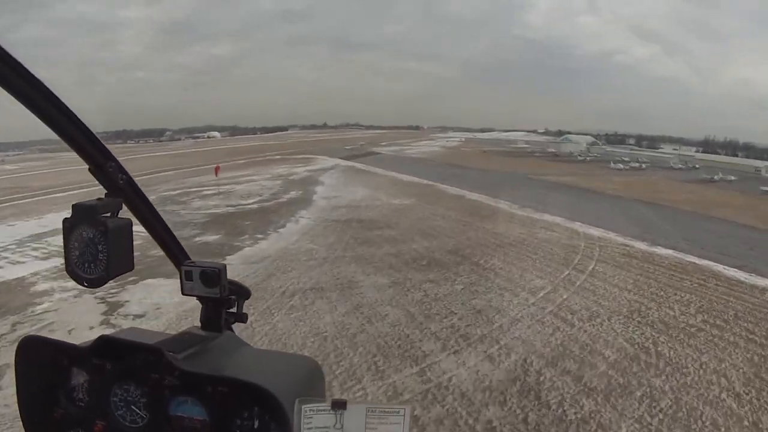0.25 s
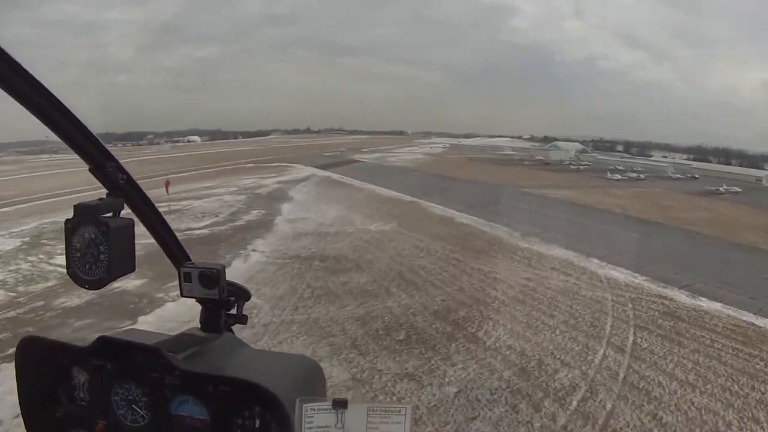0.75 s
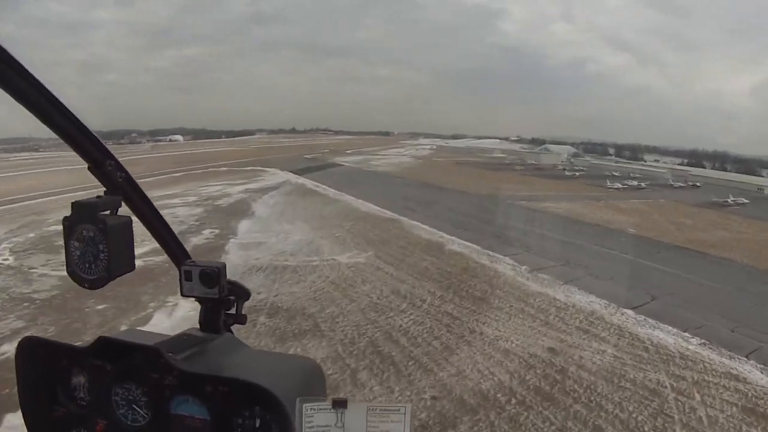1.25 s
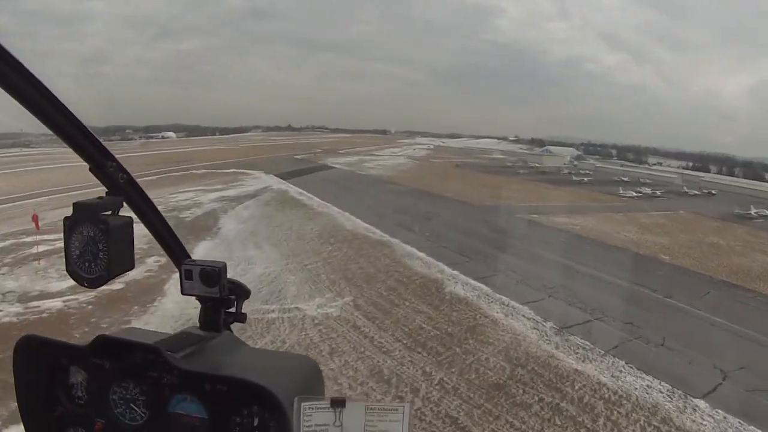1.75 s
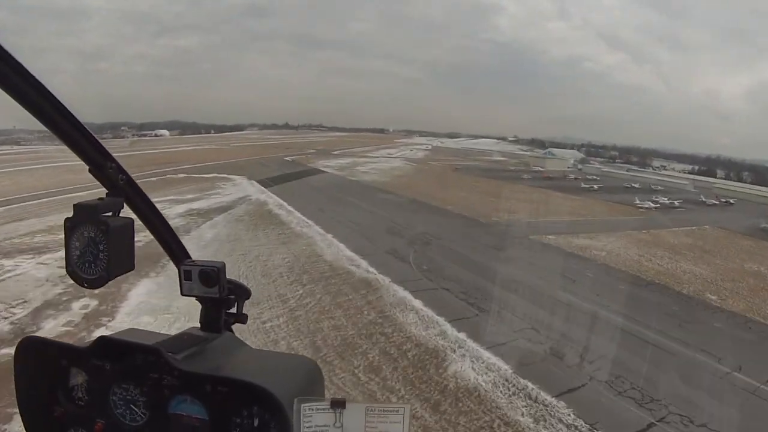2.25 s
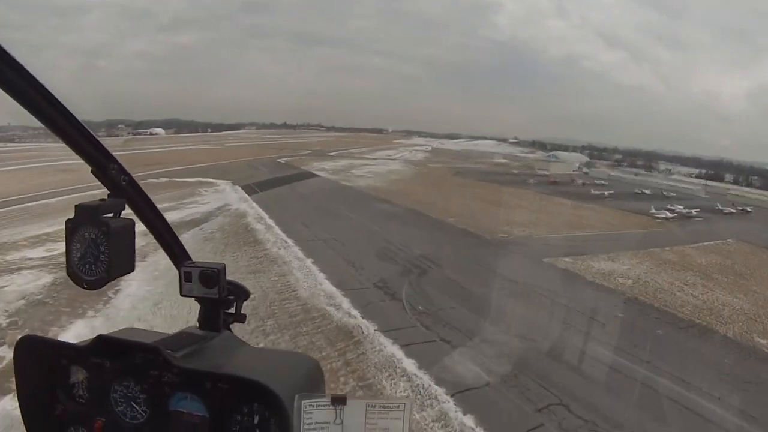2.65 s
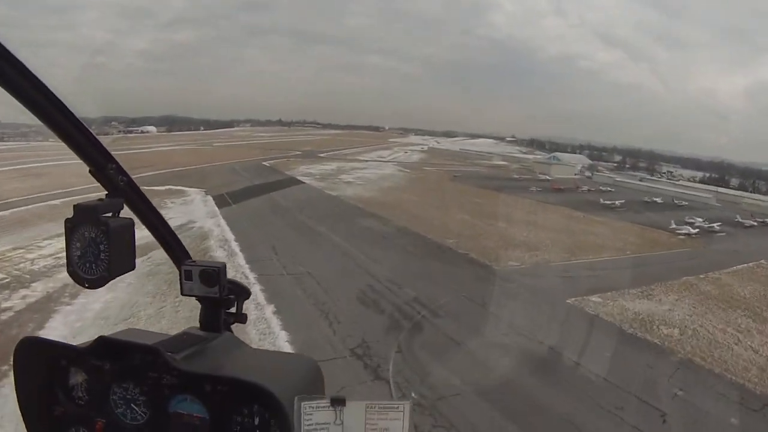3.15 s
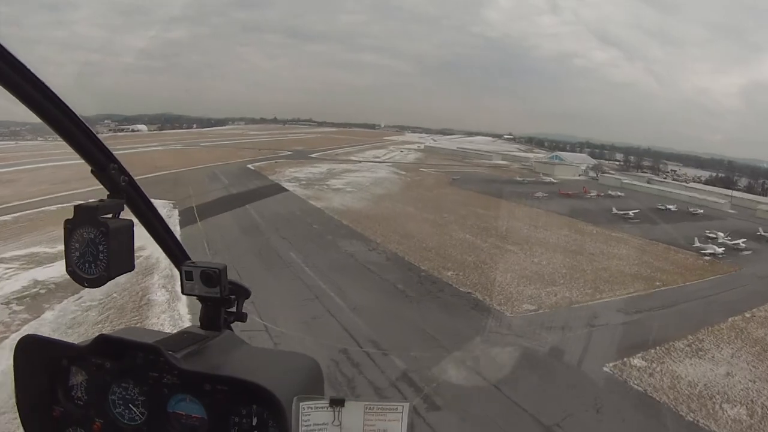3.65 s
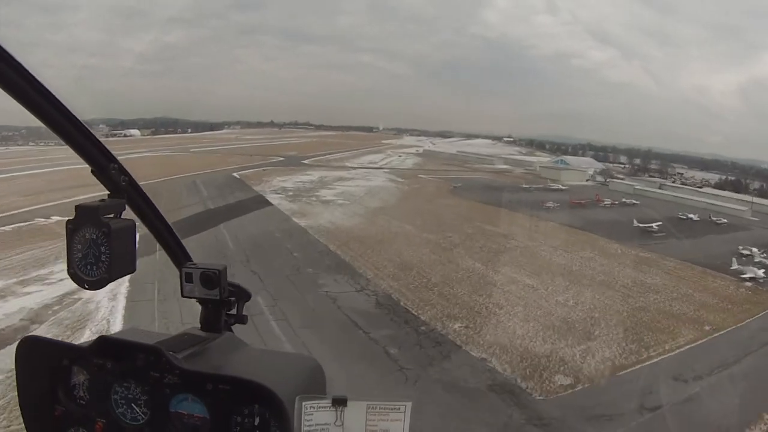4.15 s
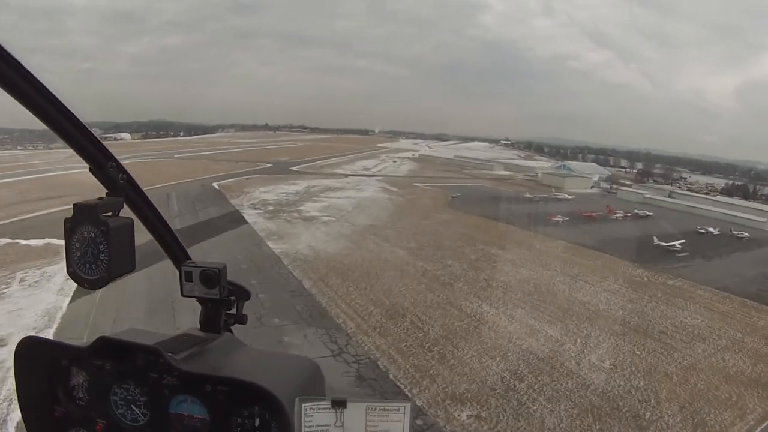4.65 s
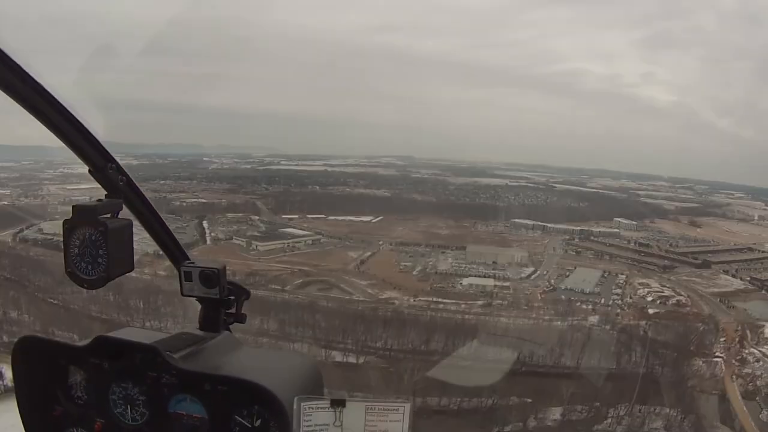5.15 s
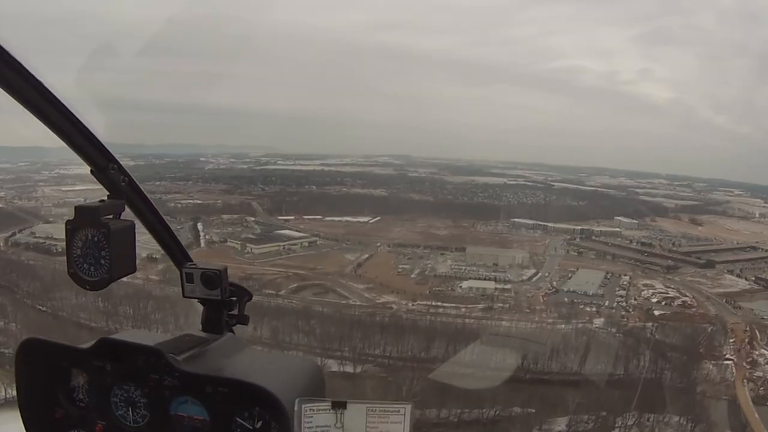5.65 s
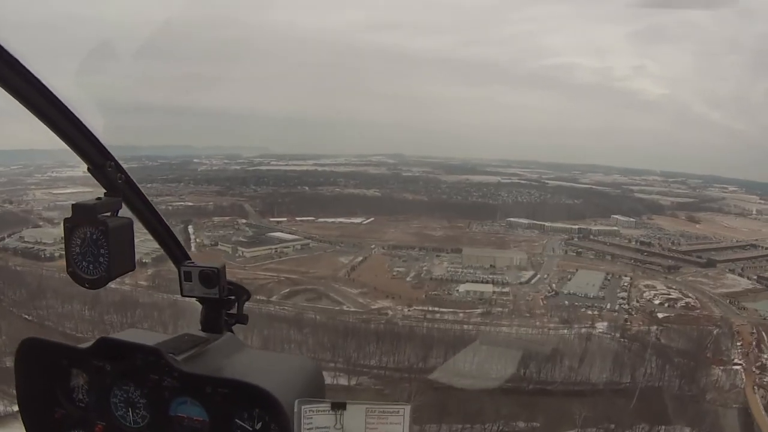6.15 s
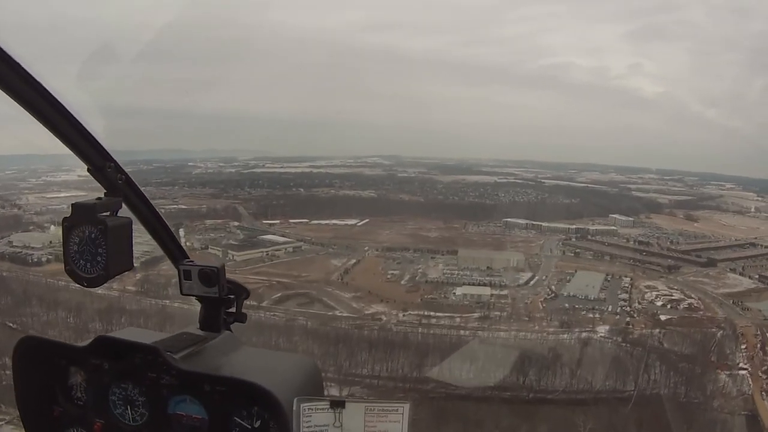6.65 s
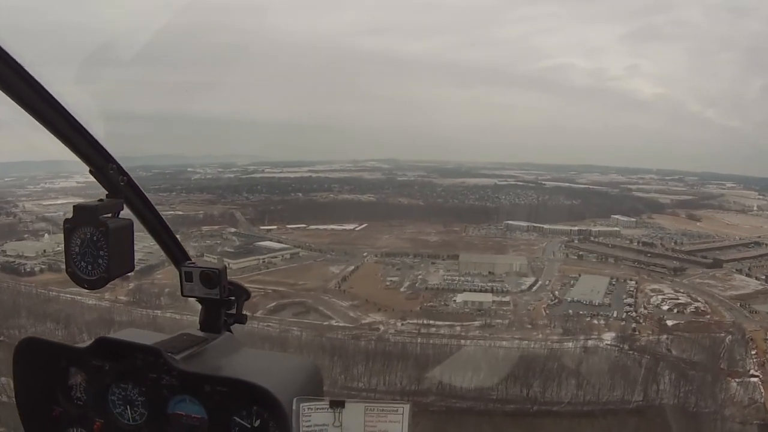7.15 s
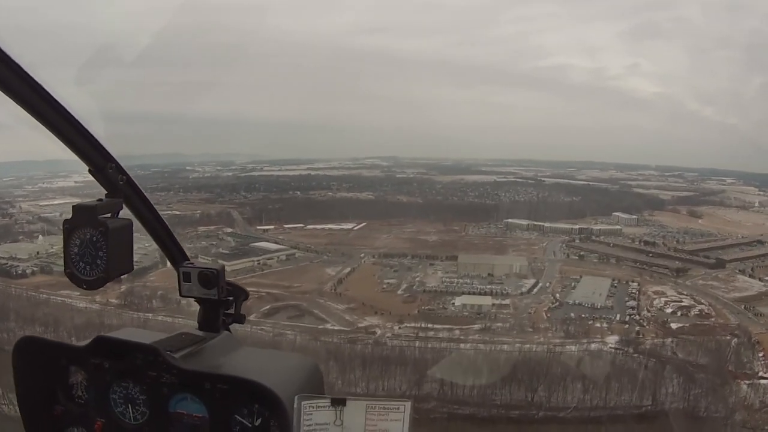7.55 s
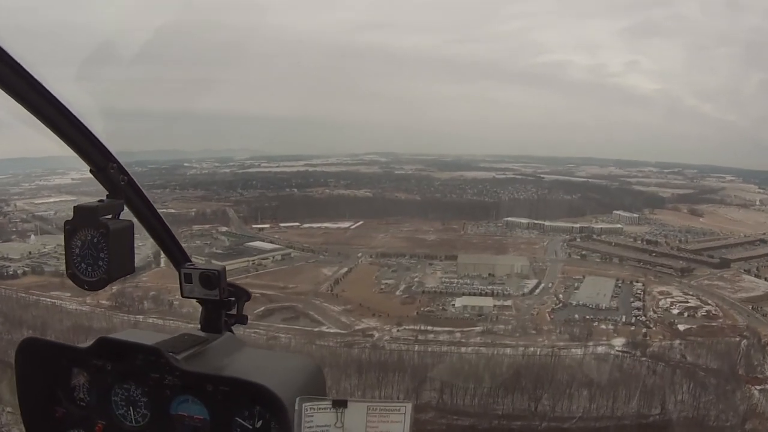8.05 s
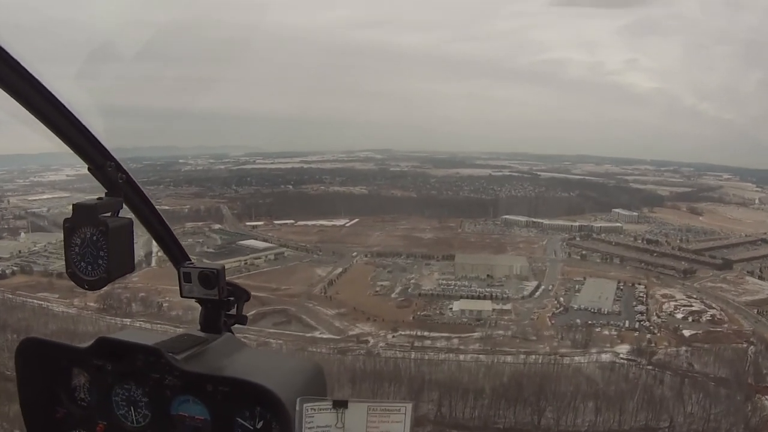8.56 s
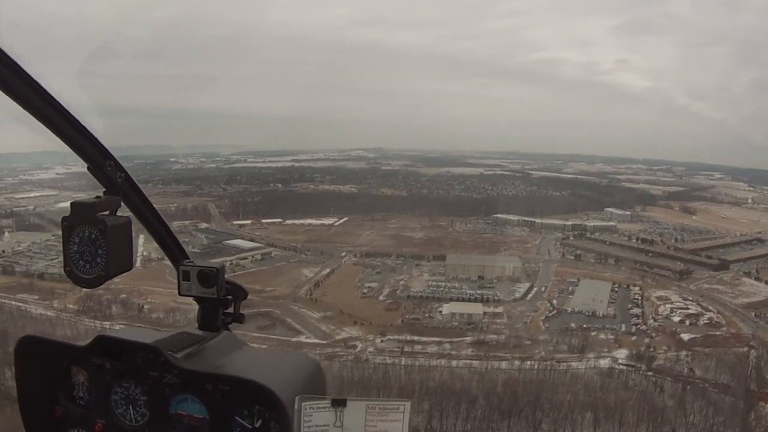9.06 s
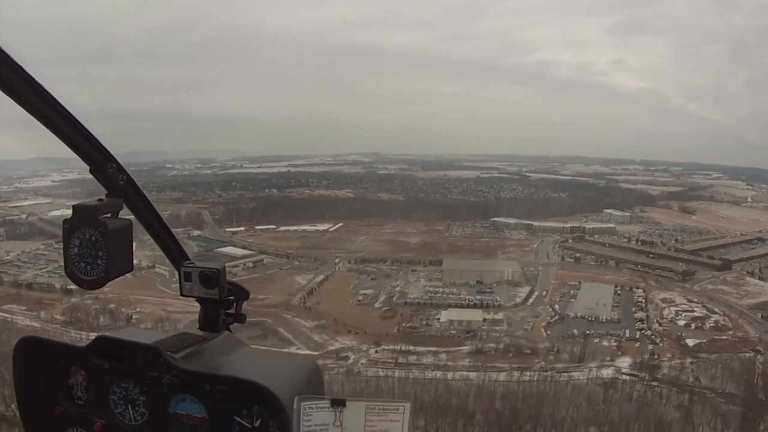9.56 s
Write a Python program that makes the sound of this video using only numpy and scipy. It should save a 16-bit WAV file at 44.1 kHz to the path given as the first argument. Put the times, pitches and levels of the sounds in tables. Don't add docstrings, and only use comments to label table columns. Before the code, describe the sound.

Close inside a small piston helicopter cabin, a loud, deep engine drone throbs with a rapid blade beat of about seventeen per second. A loose camera mount slams and chatters in dry, hard knocks. Panels rumble and dull wind hisses beneath. Around five seconds a click cuts to the climb, much the same but duller in its knocking. The housed microphone sounds boxy and slightly saturated.

```python
import sys
import numpy as np
from scipy import signal
from scipy.io import wavfile
from scipy.ndimage import uniform_filter1d

SR = 44100
rng = np.random.default_rng(int(sys.argv[2]) if len(sys.argv) > 2 else 0)


def volts_from_db(level):
    exponent = np.asarray(level, float) / 20
    return 10 ** exponent


def int16_out(signal):
    q = np.round(np.clip(np.atleast_2d(signal).T, -1, 1) * 32767)
    wavfile.write(sys.argv[1], SR, q.astype(np.int16))


N = 431738


def evened(x):
    return x / np.sqrt(np.mean(x ** 2) + 1e-20)


def curve(table):
    return np.interp(np.arange(N) / SR, *np.transpose(table))


def wander(count, rate_hz):
    knots = rng.standard_normal((count, int(N / SR * rate_hz) + 2))
    at = np.arange(N) * rate_hz / SR
    return [np.interp(at, np.arange(len(row)), row) for row in knots]


def noise(colour, size, patchy_db):
    hz = np.fft.rfftfreq(size, 1 / SR)
    real, imag, patches = rng.standard_normal((4 * N // size + 5, len(hz), 3)).T
    patches = uniform_filter1d(patches, size=6, axis=0)
    patches = evened(uniform_filter1d(patches, size=6, axis=1))
    colour_hz, colour_db = np.transpose(colour)
    level_db = np.interp(np.log(hz + 1), np.log(colour_hz + 1), colour_db, right=-120)
    spectra = (real + 1j * imag) * volts_from_db(level_db[:, None] + patchy_db * patches)
    return evened(signal.istft(spectra, nperseg=size, noverlap=3 * size // 4)[1][:N])


# (time [s], speed [cycles/s])
ENGINE_SPEED = [
    [(0.0, 21.892), (0.852, 21.89), (1.704, 21.864), (2.556, 21.827), (3.407, 21.818), (4.259, 21.784),
     (5.111, 21.83)],
    [(5.111, 21.816), (5.891, 21.927), (6.671, 22.002), (7.45, 22.019), (8.23, 21.997), (9.01, 21.92),
     (9.79, 21.961)],
]
GEARING = [
    (-.15, -.40, .7932, 5.0845),
    (.676, .283, .7956, 5.099),
]


def shafts():
    t = np.arange(N) / SR
    stage = (t >= ENGINE_SPEED[1][0][0]).astype(int)
    turns = np.zeros(N)
    for k, rows in enumerate(ENGINE_SPEED):
        here = stage == k
        turns[here] = np.cumsum(np.interp(t[here], *np.transpose(rows))) / SR
    engine_start, blade_start, blade_gear, tail_gear = np.array(GEARING)[stage].T
    return engine_start + turns, blade_start + blade_gear * turns, tail_gear * turns, stage


# (engine order [1], blade order [1], takeoff rms [dB], climb rms [dB])
ENGINE_TONES = [(1, 0, -27, -31), (2, 0, -33, -31), (3, 0, -20, -22), (4, 0, -27, -27), (5, 0, -34, -41),
                (6, 0, -39, -44), (7, 0, -44, -47), (8, 0, -53, -50), (10, 0, -51, -56), (12, 0, -42, -52),
                (14, 0, -42, -43), (15, 0, -51, -54), (22, 0, -57, -57), (27, 0, -58, -60),
                (34, 0, -60, -63), (36, 0, -60, -60), (44, 0, -56, -58), (51, 0, -59, -62),
                (13, 0, -51, -53), (11, 0, -53, -51)]
BLADE_BEATS = [(0, 1, -40, -35), (0, 1.5, -46, -46), (0, 2, -46, -50), (0, 4, -27, -25), (0, 5, -52, -41),
               (2, 1, -45, -41), (3, 1, -38, -38), (3, 2, -47, -41), (4, -1, -35, -35), (4, 1, -38, -37),
               (4, 2, -50, -40), (5, -1, -45, -50), (5, 1, -42, -46), (2, 2, -47, -49), (2, 3, -47, -48),
               (3, 3, -50, -45), (4, 3, -49, -47), (4, 4, -49, -48), (5, 2, -48, -47), (6, 1, -52, -47),
               (0, 18, -56, -50), (0, 19, -55, -47), (0, 20, -55, -48), (0, 21, -58, -51)]
# (multiple of tail pass rate [1], takeoff rms [dB], climb rms [dB])
TAIL_TONES = [(2 / 3, -39, -41), (1, -35, -36), (2, -48, -42.5), (3, -47, -48), (8.053, -57, -62),
              (30.35, -66, -67), (91.2, -90, -91)]


def drivetrain(engine, blade, tail, stage):
    out = np.zeros(N)
    tones = ENGINE_TONES + BLADE_BEATS
    drift = wander(count=len(tones) + len(TAIL_TONES), rate_hz=3.0)
    centre = np.array([3.5, 4.0])[stage]
    for (m, n, *level_db), sway in zip(tones, drift):
        if m + n < 3 or m == 0:
            lag = .23 * m
        else:
            lag = .08 * (m - 3) * (m + 3 - 2 * centre)
        sign = -1 if n < 0 else 1
        gain = volts_from_db(np.array(level_db)[stage] + .9 * sway)
        out += sign * gain * np.cos(2 * np.pi * (m * engine + n * blade - lag))
    for (k, *level_db), sway in zip(TAIL_TONES, drift[::-1]):
        gain = volts_from_db(np.array(level_db)[stage] + 1.5 * sway)
        out += gain * np.cos(2 * np.pi * (k * tail + 0.11 * sway))
    return np.sqrt(2) * out


# (time [s], blow level [dB], brightness [dB])
HARD_KNOCKS = [(0.0613, -16.5, -10), (0.186, -20, -17), (0.2334, -21.5, -12), (0.6439, -19, -15),
               (0.6998, -15.5, -11.5), (1.053, -23.5, -13), (1.284, -15.5, -14), (1.514, -20.5, -11),
               (1.7509, -18.5, -12), (1.8637, -19.5, -11.5), (1.924, -18.5, -11), (2.0662, -20, -11),
               (2.152, -14.5, -13), (2.3815, -16, -12), (2.4379, -20, -10.5), (2.6105, -15, -16),
               (2.8953, -17, -12), (3.1258, -17.5, -12), (3.3553, -16, -14.5), (3.5384, -17, -13.5),
               (3.6531, -19.5, -17), (3.7095, -19, -13), (3.9389, -19.5, -14), (4.122, -19, -15),
               (4.1689, -19.5, -16), (4.3979, -19, -15), (4.581, -18, -14), (4.9816, -20, -14),
               (5.0414, -18, -15), (5.0968, -16, -13),
               (5.1448, -18.5, -17), (5.1995, -19, -12.5), (5.26, -15.5, -13.5), (5.429, -19, -16),
                (6.3421, -18, -19), (6.5228, -13, -14), (6.579, -16.5, -17), (6.7511, -20, -16),
                (6.808, -15, -16), (6.9196, -16, -14), (7.0345, -15.5, -16), (7.0918, -20, -15),
                (7.1467, -17.5, -16), (7.2056, -15.5, -16), (7.2625, -17, -16), (7.4906, -17.5, -16),
                (7.7182, -17.5, -16), (8.352, -16.5, -15), (8.3994, -18, -17), (8.6915, -19.5, -17),
                (8.746, -18.5, -16), (8.8078, -19, -15), (8.9204, -17, -21), (8.9761, -19.5, -12.5),
                (9.0364, -16, -15), (9.205, -19, -17), (9.266, -21, -14), (9.434, -14.5, -14),
                (9.5501, -19, -14), (9.6632, -16.5, -13)]
# (time [s], blade angle [turns])
SLAM_ANGLE = [(0, -.34), (.8, -.2), (1.2, -.09), (2.1, -.03), (3.2, -.14), (4.1, -.06), (5.11, -.08),
              (5.112, -.16), (6.3, -.11), (7.0, -.15), (7.8, -.18), (8.6, -.13), (9.79, -.15)]
# (time [s], slam level [dB])
LOOSENESS = [(0, 1), (.8, 0), (1.3, -5), (2.2, 0.5), (4.3, -1), (5.1, -0.5), (5.5, -1.5), (6.2, 1),
             (7.2, -2), (8.5, 1.5), (9.79, -3)]
JOLT_ANGLES = [
    (.19, .4, .6, .94),
    (.13, .35, .6, .88),
]
# (level [dB], ..)
JOLT_DB = [
    (-22, -27, -23.5, -22),
    (-23, -21, -21, -21),
]
JOLT_PULL = (.9, .6)


def knocks(engine, blade, stage):
    miss_db_per_turn, scatter_db, jitter_s = 28, 1.5, .0012
    stray_share, stray_db, stray_spread_db = np.array((.35, .18)), -31, 2.5
    bright_db, bright_spread_db = np.array((-11.5, -14.5)), 2.5
    t = np.arange(N) / SR
    jolts = np.array(JOLT_ANGLES)

    at = np.flatnonzero(np.diff(np.floor(blade - curve(SLAM_ANGLE))) == 1)
    part, chance = stage[at], rng.standard_normal((len(at), 3))
    gaps = (jolts[part] - engine[at, None] + .5) % 1 - .5
    nearest = np.argmin(abs(gaps), axis=1)
    gap = gaps[np.arange(len(at)), nearest]
    pull_s = np.array(JOLT_PULL)[part] * gap / ENGINE_SPEED[0][0][1]
    slam_s = t[at] + pull_s + jitter_s * chance[:, 0]
    slam_db = np.array(JOLT_DB)[part, nearest] + curve(LOOSENESS)[at]
    slam_db = slam_db - miss_db_per_turn * abs(gap) + scatter_db * chance[:, 1]
    slams = np.transpose([slam_s, slam_db, bright_db[part] + bright_spread_db * chance[:, 2]])

    at = np.flatnonzero((np.diff(np.floor(engine - jolts[stage].T), axis=1) == 1).any(0))
    part, chance = stage[at], rng.standard_normal((len(at), 3))
    picked = rng.random(len(at)) < stray_share[part]
    strays = np.transpose([t[at] + 2 * jitter_s * chance[:, 0],
                           stray_db + stray_spread_db * abs(chance[:, 1]),
                           bright_db[part] - 4.0 + bright_spread_db * chance[:, 2]])[picked]

    hard = np.array(HARD_KNOCKS) + (0, -1.0, 4.0)
    rest = np.vstack([slams, strays])
    clear = abs(rest[:, :1] - hard[:, 0]).min(axis=1) > .018
    return np.vstack([hard, rest[clear & (rest[:, 0] > 0)]])


def ring(x, hz, width_hz):
    r, w = np.exp(-np.pi * width_hz / SR), 2 * np.pi * hz / SR
    return signal.lfilter([0, np.sin(w)], [1, -2 * r * np.cos(w), r * r], x)


# (frequency [Hz], width [Hz], level [dB])
MOUNT_MODES = [(1060, 140, -17), (1212, 230, -8), (1548, 221, 2), (1743, 238, -1), (2066, 180, -10.5),
               (3060, 3000, -29.5), (3570, 230, -22.5)]
# (frequency [Hz], width [Hz], level [dB])
SHELL_MODES = [(2364, 63, -9), (2422, 72, -8.5)]


def rattle(engine, blade, stage):
    s, blow_db, bright_db = knocks(engine, blade, stage).T
    chance = rng.random((len(s), 12))
    bounce = np.arange(4)
    after_s = np.cumsum((.0007 + 0.002385 * chance[:, :4]) * (bounce > 0), axis=1)
    at = np.minimum(((s[:, None] + after_s) * SR).astype(int), N - 1)
    size = volts_from_db(blow_db[:, None] + 2.0 - bounce * (3.5 + 5.4 * chance[:, 4:8]))
    size[:, 1:] *= np.sign(chance[:, 9:] - .5)
    dull, bright = np.zeros((2, N))
    np.add.at(dull, at, size)
    np.add.at(bright, at, size * volts_from_db(bright_db[:, None] + 4.5))

    shaken = signal.lfilter([1], [1, -np.exp(-1 / (0.0062 * SR))], abs(dull))
    tremble = volts_from_db(-40.5 + 3.0 * np.cos(2 * np.pi * (blade + 0.059))) + 0.19 * shaken
    spread = volts_from_db(3.0 * np.minimum(rng.exponential(1, N), 3))
    hits = rng.random(N) < 400 / SR
    chatter = hits * tremble * spread * rng.choice([-1, 1], N)

    body = np.zeros(N)
    for k, (hz, width_hz, db) in enumerate(MOUNT_MODES):
        body += (-1) ** k * volts_from_db(db) * ring(dull + chatter, hz, width_hz)
    for hz, width_hz, db in SHELL_MODES:
        body += volts_from_db(db) * ring(bright + volts_from_db(-7.0) * chatter, hz, width_hz)
    contact = signal.windows.hann(14)
    return np.convolve(body, contact / contact.sum(), "same")


# (frequency [Hz], density [dB])
RUMBLE = [(14, -22), (22, -6), (32, -11), (52, -11), (66, 1), (100, -3), (150, -6), (168, -10), (250, -14),
          (263, -4), (332, -5), (346, -11), (430, -14), (520, -30)]
# (frequency [Hz], density [dB])
HISS = [(400, -30.5), (500, -6), (560, -7.5), (610, 1.5), (670, 0.5), (720, -9), (970, -2.5), (1130, -7.5),
        (1550, -3), (2000, -6), (2230, -11), (2420, -16.5), (2650, -23), (3200, -39.5)]
# (frequency [Hz], density [dB])
AIR = [(2200, -38.5), (2800, 2.5), (3400, 0), (3750, -5), (5000, -6.5), (6100, -7.5), (7000, -14),
       (7900, -20), (9000, -23.5), (10100, -23), (12000, -33.5), (13600, -37.5), (13750, -69)]
# (frequency [Hz], density [dB])
SWISH = [(4200, -40), (5200, -8), (6500, -0.5), (7300, -2), (7900, -9.5), (9500, -21), (11000, -43)]
# (rumble [dB], hiss [dB], air [dB])
CABIN_DB = [
    (-29.5, -40, -52.5),
    (-29, -39.5, -52.5),
]
# (time [s], level [dB])
BLADE_LOAD = [
    (0, -68.5),
    (2.5, -63.5),
    (5.092, -64),
    (5.13, -62.5),
    (9.79, -64),
]


def cabin(blade, stage):
    rumble_db, hiss_db, air_db = np.array(CABIN_DB)[stage].T
    pump = np.cos(2 * np.pi * (blade + .05))
    rumble = noise(RUMBLE, size=8192, patchy_db=0) * volts_from_db(rumble_db + 1.4 * pump)
    hiss = noise(HISS, size=1024, patchy_db=1.5) * volts_from_db(hiss_db + 1.2 * pump)
    air = noise(AIR, size=512, patchy_db=1.9) * volts_from_db(air_db)
    sweep = evened(volts_from_db(7.0 * np.cos(2 * np.pi * (blade - .56))))
    swish = noise(SWISH, size=256, patchy_db=4.0) * sweep * volts_from_db(curve(BLADE_LOAD))
    return rumble + hiss + air + swish


# (takeoff [dB], climb [dB])
TICK_DB = (-46.5, -44)


def add_ticks(mix):
    first_s, every_s = (.4469, 5.3088), 1.23705
    s = np.add.outer(first_s, every_s * np.arange(4))
    mix[(s * SR).astype(int)] += volts_from_db(TICK_DB)[:, None]


def blend_cut(mix, stage):
    jump, blend = .2, int(.006 * SR)
    cut = np.argmax(stage)
    fade = np.sin(np.linspace(0, np.pi / 2, blend)) ** 2
    mix[cut - blend:cut] += (mix[cut] - mix[cut - 1] - jump) * fade


def scene():
    engine, blade, tail, stage = shafts()
    mix = drivetrain(engine, blade, tail, stage)
    mix += rattle(engine, blade, stage)
    mix += cabin(blade, stage)
    blend_cut(mix, stage)
    add_ticks(mix)
    return mix[None]


def top_cut(x):
    return signal.sosfilt(signal.butter(12, 15800, fs=SR, output="sos"), x)


def record(dry):
    ceiling = .62
    x = ceiling * np.tanh(volts_from_db(0.39) * dry / ceiling)
    lowpass = signal.firwin(255, 15200, window=("kaiser", 9), fs=SR)
    x = signal.oaconvolve(x, lowpass[None], "same")
    return top_cut(x)


dry = scene()
out = record(dry)
int16_out(out)
```